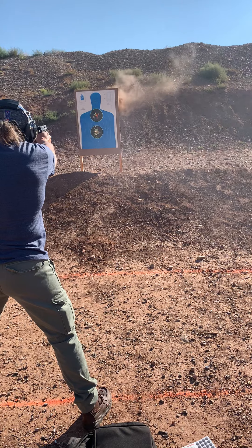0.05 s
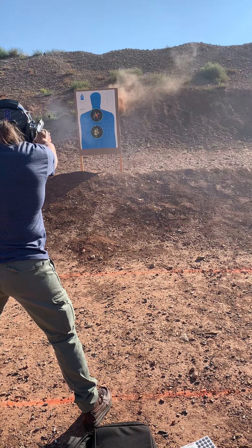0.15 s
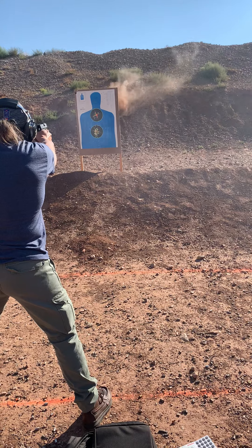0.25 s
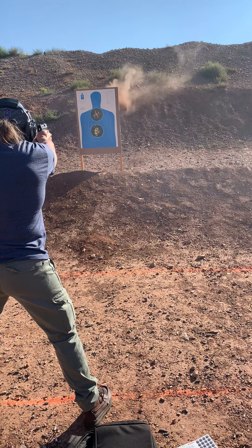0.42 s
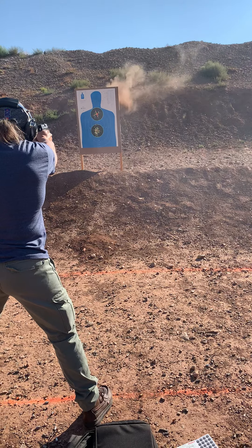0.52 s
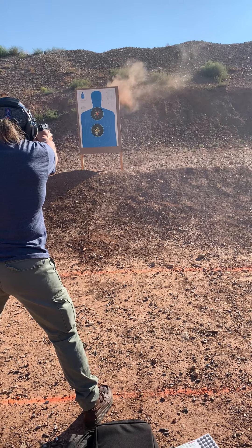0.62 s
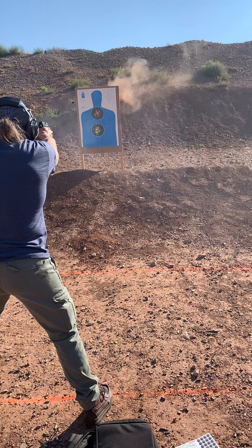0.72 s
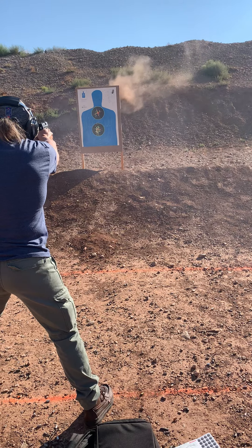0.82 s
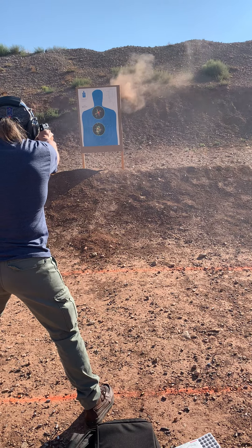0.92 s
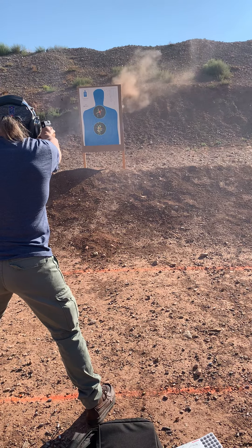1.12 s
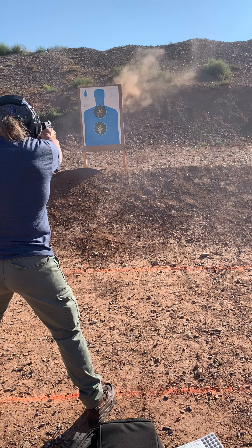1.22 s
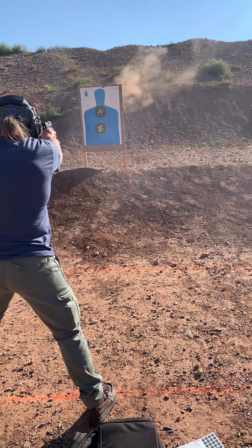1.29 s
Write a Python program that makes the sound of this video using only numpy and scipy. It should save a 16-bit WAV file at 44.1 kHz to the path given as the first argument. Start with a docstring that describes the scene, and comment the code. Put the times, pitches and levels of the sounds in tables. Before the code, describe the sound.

Handgun fires three sharp overloaded cracks at an open range, with brief echoes off earth banks

```python
"""An outdoor range, with a camera close to a pistol that fires three quick shots and overloads its microphones.
Faint air, thuds of air on the microphone and a low hum lie underneath; an earlier shot still rings.
Each blast is a short burst of coloured noise with a ground bounce, a few cycles of hollow body and gravel scatter.
A slap with a low, sagging boom follows about 22 ms later; the earth banks scatter a short tail of fading noise."""
import sys
import numpy as np
from scipy import signal
from scipy.fft import rfft, irfft
from scipy.io import wavfile

SR = 44100
rng = np.random.default_rng(int(sys.argv[2]) if len(sys.argv) > 2 else 0)


def file_out(sig):
    """Save sig as 16-bit WAV at sys.argv[1]."""
    # one column per channel
    cols = np.atleast_2d(sig).T
    # limit, then scale
    lim = np.clip(cols, -1, 1)
    pcm = np.round(lim * 32767).astype(np.int16)
    wavfile.write(sys.argv[1], SR, pcm)


N = 59535  # length in samples

RISE_S = 0.00014  # sharp onset shared by the bodies, the gravel and the tail


def amp(db):
    """Decibels to gain."""
    return 10 ** (np.asarray(db) / 20)


def read(points, hz):
    """Reads a table on a log-frequency axis."""
    f, value = np.transpose(points)
    return np.interp(np.log(hz + 1), np.log(f), value)


def since(start):
    """Seconds since start, zero before it."""
    return np.maximum(np.arange(N) / SR - start, 0)


def delayed(x, s):
    """Moves a sound by s seconds; a negative s cuts off its beginning."""
    shift = round(s * SR)
    late, early = max(shift, 0), max(-shift, 0)
    return np.pad(x, ((0, 0), (late, early)))[:, early:][:, :N]


def burst(t, rise, fade):
    """Quick rise, exponential fall."""
    return (1 - np.exp(-t / rise)) * np.exp(-t / fade)


# How much later the right microphone hears a sound. Each row: frequency in Hz, lag in seconds.
MICROPHONE_LAG = [(200, .00016), (900, 0.000089), (2500, 0.000065), (5300, 0.00011), (8500, 0.00012),
                  (12500, .00012)]


def noise(colour, likeness):
    """Random-phase noise of unit level, partly shared by the two microphones and later at the right one."""
    hz = np.fft.rfftfreq(N, 1 / SR)
    left, other = np.exp(2j * np.pi * rng.random((2, len(hz))))
    same = np.clip(read(likeness, hz), 0, 1)
    mixed = same * left + np.sqrt(1 - same ** 2) * other
    right = mixed * np.exp(-2j * np.pi * hz * read(MICROPHONE_LAG, hz))
    x = irfft(np.array([left, right]) * amp(read(colour, hz)), N)
    return x / x.std()


def thud(t, peak, first_hz, last_hz, sag):
    """A push of air that sags in pitch as it dies."""
    turns = last_hz * t + (first_hz - last_hz) * sag * (1 - np.exp(-t / sag))
    swell = t / peak * np.exp(1 - t / peak)
    return swell * np.sin(2 * np.pi * turns)


# Likeness of the two microphones for distant sound. Each row: frequency in Hz, likeness from 0 to 1.
FAR_LIKENESS = [(100, 1), (500, 0.38), (1200, 0.49), (4000, 0.28), (9000, 1)]
# Colour of the outdoor air. Each row: frequency in Hz, relative level in dB per Hz.
AIR_COLOUR = [(20, 0.5), (45, 9), (90, -4), (250, -15), (600, -3), (1200, -4), (2400, -2.5), (4500, -12),
              (9000, -22.5), (16000, -43)]
# Low thuds of air on the microphone. Each row: start in seconds, time to peak in seconds,
# first pitch in Hz, level in dB.
AIR_THUDS = [(0.265, 0.0062, 118, -29.5), (.312, 0.0072, 59.6, -44.5), (0.779, 0.0048, 69.6, -30),
             (0.82, 0.0081, 150, -28.5), (0.859, 0.009, 68.5, -40), (0.945, 0.0067, 119, -58),
             (1.321, 0.011, 122, -57.5)]
# Course of the low hum. Each row: time in seconds, level in dB.
HUM_LEVEL = [(0, -68), (.1, -74), (.17, -63), (.37, -55), (.5, -64), (.66, -70.5), (.95, -59),
             (1.01, -75.5), (1.35, -76)]
AIR_DB, HUM_HZ = -80, 43.5
PUFF_END_HZ, PUFF_SAG_S = 46.6, 0.0072


def air():
    """Faint outdoor noise, pitch-sagging thuds on the microphone and a sine hum that swells and fades."""
    t = np.arange(N) / SR
    puffs = 0
    for start, peak, first_hz, db in AIR_THUDS:
        puffs = puffs + amp(db) * thud(since(start), peak, first_hz, PUFF_END_HZ, PUFF_SAG_S)
    hum = amp(np.interp(t, *np.transpose(HUM_LEVEL))) * np.sin(2 * np.pi * HUM_HZ * t)
    return amp(AIR_DB) * noise(AIR_COLOUR, FAR_LIKENESS) + puffs + hum


LUMPY_DB, LUMP_S = 1, 0.0025  # spread of the unevenness, spacing of its random points


def lumps():
    """Uneven strength of the reflections from rough ground."""
    knots = np.arange(N) / SR / LUMP_S
    return amp(LUMPY_DB * np.interp(knots, np.arange(N), rng.standard_normal(N)))


# Colour of the near scatter. Each row: frequency in Hz, relative level in dB per Hz.
TAIL_COLOUR = [(40, 1.5), (120, 1), (280, -6), (500, 1.5), (900, 6), (1400, 3.5), (2300, 1), (4000, -6),
               (5500, -10.5), (9000, -12), (12000, -19.5), (16000, -28.5)]
# How long the near scatter rings. Each row: frequency in Hz, time to fall by 60 dB in seconds.
TAIL_DECAY = [(60, 0.2), (250, 0.38), (800, 0.35), (2000, 0.35), (4000, 0.38), (8000, 0.35), (15000, 0.38)]
TAIL_DB, TAIL_START_S = -20.5, 0.019


def near_scatter():
    """Reflections from the range: noise that dies at its own pace in each frequency band."""
    hz, frame_s, z = signal.stft(noise(TAIL_COLOUR, FAR_LIKENESS), SR, nperseg=256)
    age = np.maximum(frame_s - TAIL_START_S, 0)
    fading = z * amp(-60 * age / read(TAIL_DECAY, hz)[:, None])
    near = signal.istft(fading, SR, nperseg=256)[1][:, :N]
    return amp(TAIL_DB) * near * (1 - np.exp(-since(TAIL_START_S) / RISE_S))


# Colour of the return from the far bank. Each row: frequency in Hz, relative level in dB per Hz.
BANK_COLOUR = [(60, -13), (250, -11), (500, 1.5), (880, 5.5), (1250, -2.5), (2500, -21), (6000, -29),
               (16000, -52)]
# Colour of the last wash. Each row: frequency in Hz, relative level in dB per Hz.
WASH_COLOUR = [(60, -4), (250, -5), (550, -3.5), (1200, 0.5), (2400, -5), (4000, -9), (5500, -19.5),
               (9000, -23), (16000, -44.5)]
# Colour of the distant echo. Each row: frequency in Hz, relative level in dB per Hz.
ECHO_COLOUR = [(100, -32), (300, -9), (520, 2.5), (800, -19), (2500, -10), (6000, -25), (16000, -56)]
BANK_DB, BANK_S, BANK_SWELL_S, BANK_FADE_S = -31, 0.098, 0.039, 0.037
WASH_DB, WASH_FADE_S = -62, .29
ECHO_DB, ECHO_S, ECHO_HALF_S = -66.5, 0.335, 0.04


def tail():
    """Scatter from the range, a darker return from the far bank, a last wash and one distant echo."""
    t = since(0)
    swell = np.exp(-np.maximum(BANK_S - t, 0) / BANK_SWELL_S - since(BANK_S) / BANK_FADE_S)
    bank = amp(BANK_DB) * noise(BANK_COLOUR, FAR_LIKENESS) * swell
    wash_shape = (1 - np.exp(-t / BANK_SWELL_S)) * np.exp(-(t / WASH_FADE_S) ** 2)
    wash = amp(WASH_DB) * noise(WASH_COLOUR, FAR_LIKENESS) * wash_shape
    echo_shape = np.exp(-((t - ECHO_S) / ECHO_HALF_S) ** 2)
    echo = amp(ECHO_DB) * noise(ECHO_COLOUR, FAR_LIKENESS) * echo_shape
    return (near_scatter() + bank + wash + echo) * lumps()


GROUND_S, GROUND_DB = .0023, -6.5  # delay and strength of the bounce


def grounded(x):
    """Adds the bounce off the ground, a weaker delayed copy."""
    hz = np.fft.rfftfreq(N, 1 / SR)
    bounce = amp(GROUND_DB) * np.exp(-2j * np.pi * hz * GROUND_S)
    return irfft(rfft(x) * (1 + bounce), N)


BODY_LAG_S = 0.00026  # lag of the body at the right microphone


def body(resonances):
    """A few cycles of each resonance under a bell-shaped swell, the deepest last."""
    t = np.array([since(0), since(BODY_LAG_S)])
    x = 0
    for hz, db, delay, half in resonances:
        age = t - delay
        x = x + amp(db) * np.cos(2 * np.pi * hz * age) * np.exp(-(age / half) ** 2)
    return x * (1 - np.exp(-t / RISE_S))


# Likeness of the two microphones for close sound. Each row: frequency in Hz, likeness from 0 to 1.
NEAR_LIKENESS = [(100, .9), (500, .8), (1200, .65), (4000, .85), (9000, .95)]
# Colour of the slap. Each row: frequency in Hz, relative level in dB per Hz.
SLAP_COLOUR = [(100, -21), (500, -8), (900, -4), (1080, -1), (1600, 1), (1950, 5.5), (2350, 3), (2750, -6),
               (3100, 0), (3500, -8), (3950, 4.5), (5500, -8), (9500, -8.5), (13000, -18.5), (16000, -22.5)]
# Hollow body of the slap. Each row: frequency in Hz, level in dB, delay in seconds, half length in seconds.
SLAP_RESONANCES = [(235, -10.5, .0038, .0022), (500, -10.5, .0032, .002), (810, -9, .0022, .0019),
                   (1720, -18, 0.0022, 0.0048), (2360, -18.5, .0012, 0.0048)]
SLAP_DB, SLAP_RISE_S, SLAP_S = -1, .0005, .0012
BOOM_DB, BOOM_PEAK_S, BOOM_SAG_S = -13.5, 0.0082, .0085
BOOM_START_HZ, BOOM_END_HZ = 180, 57.5
BOOM_LAG_S = 0.00044  # the boom reaches the right microphone first


def slap():
    """A second, duller crack with its ground bounce and body, and a low boom that sags in pitch."""
    crack = amp(SLAP_DB) * noise(SLAP_COLOUR, NEAR_LIKENESS) * burst(since(0), SLAP_RISE_S, SLAP_S)
    boom_t = np.array([since(BOOM_LAG_S), since(0)])
    boom = thud(boom_t, BOOM_PEAK_S, BOOM_START_HZ, BOOM_END_HZ, BOOM_SAG_S)
    return grounded(crack) + amp(BOOM_DB) * boom + body(SLAP_RESONANCES)


# Colour of the muzzle crack. Each row: frequency in Hz, relative level in dB per Hz.
CRACK_COLOUR = [(100, -20.5), (500, -9.5), (850, -5), (1080, -7), (1250, 2.5), (1600, 2.5), (2300, -5.5),
                (2950, 2.5), (3500, -6), (4000, 5.5), (5200, -5), (7000, -6), (9500, -5), (13000, -13.5),
                (16000, -19.5)]
# Colour of the stones and gravel nearby. Each row: frequency in Hz, relative level in dB per Hz.
GRAVEL_COLOUR = [(100, -5.5), (270, 2.5), (380, -0.5), (520, 4), (800, 10), (1050, -4), (1300, 1.5),
                 (2300, -6.5), (4000, -3), (5500, -6), (9500, -10.5), (13000, -14), (16000, -20)]
# Hollow body of the blast. Each row: frequency in Hz, level in dB, delay in seconds, half length in seconds.
BLAST_RESONANCES = [(265, -7, .0072, 0.0025), (483, -11, .0051, 0.0042), (823, -10.5, 0.0033, 0.0027),
                    (1220, -20.5, .003, 0.0034)]
CRACK_DB, CRACK_RISE_S, CRACK_S = -1.5, .0007, 0.0011
GRAVEL_DB, GRAVEL_S = -19, 0.045


def blast():
    """The muzzle crack with its ground bounce, its hollow body and the scatter from the gravel."""
    t = since(0)
    crack = amp(CRACK_DB) * noise(CRACK_COLOUR, NEAR_LIKENESS) * burst(t, CRACK_RISE_S, CRACK_S)
    gravel_shape = burst(t, RISE_S, GRAVEL_S) * np.exp(-(t / GRAVEL_S) ** 2)
    gravel = amp(GRAVEL_DB) * noise(GRAVEL_COLOUR, NEAR_LIKENESS) * gravel_shape
    return grounded(crack) + gravel + body(BLAST_RESONANCES)


# The three shots. Each row: start in seconds, level in dB, delay of the slap in seconds,
# slap level in dB, tail level in dB.
SHOT_LIST = [(0.2054, 0, 0.022, -3.5, -4.5), (0.7175, .5, 0.023, -3, -5), (1.109, -.5, .0224, -2.5, -4)]
ALIKE = 0.21  # share of the tail's power that every shot repeats
EARLIER_S, EARLIER_DB = -.285, -2.5  # the range still rings from a shot before
BALANCE_DB = -0.08  # added to the left, taken from the right


def scene():
    """Three shots close to the microphones, each with slap and tail, over the quiet range."""
    usual = tail()
    out = air() + amp(EARLIER_DB) * delayed(usual, EARLIER_S)
    for start, db, slap_delay, slap_db, tail_db in SHOT_LIST:
        ring = np.sqrt(ALIKE) * usual + np.sqrt(1 - ALIKE) * tail()
        late_slap = amp(slap_db) * delayed(slap(), slap_delay)
        shot = amp(db) * blast() + late_slap + amp(tail_db) * ring
        out = out + delayed(shot, start)
    return out * amp([[BALANCE_DB], [-BALANCE_DB]])


DRIVE_DB, CEILING, EDGE_HZ = 3, .9, 16000  # input gain, level the peaks bend towards, top of the band


def record(dry):
    """The microphones overload softly at the peaks; then a low-pass limits the band."""
    x = dry * amp(DRIVE_DB) / CEILING
    clipped = CEILING * x / (1 + x ** 4) ** .25
    lowpass = signal.firwin(255, EDGE_HZ, window=("kaiser", 9), fs=SR)
    return signal.oaconvolve(clipped, lowpass[None], "same")


dry = scene()
out = record(dry)
file_out(out)
```